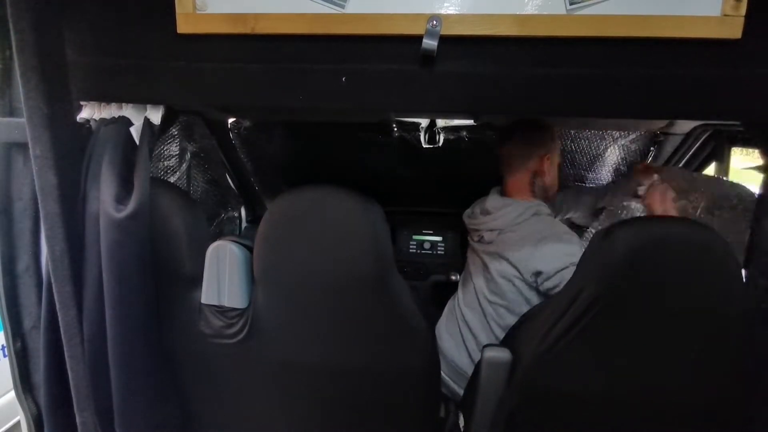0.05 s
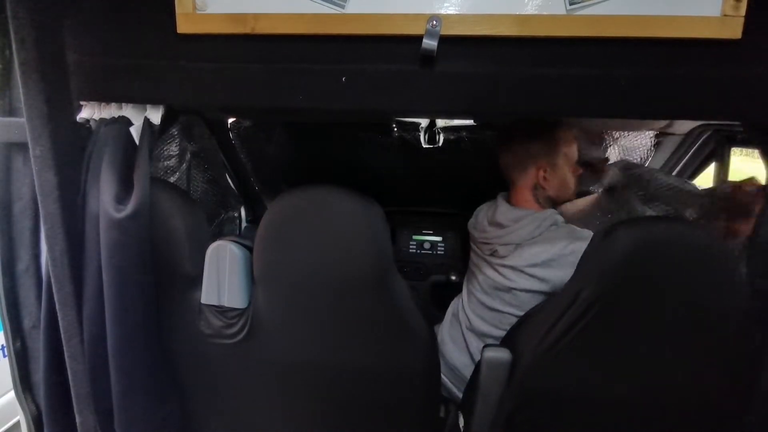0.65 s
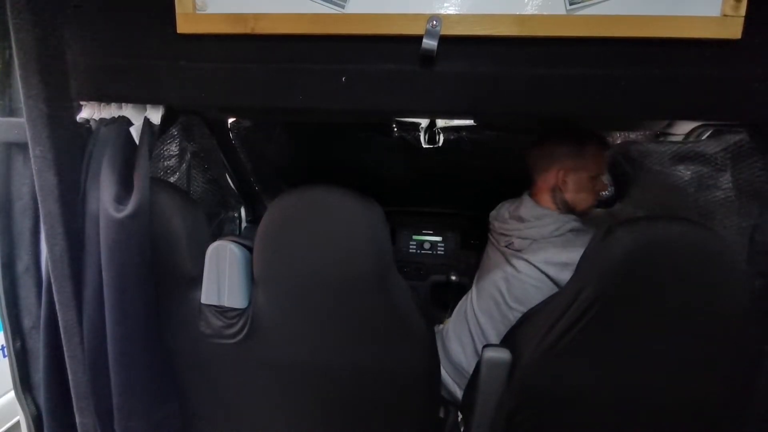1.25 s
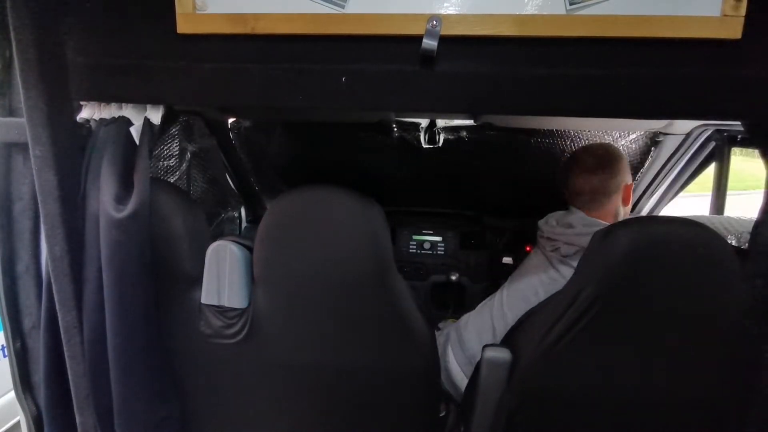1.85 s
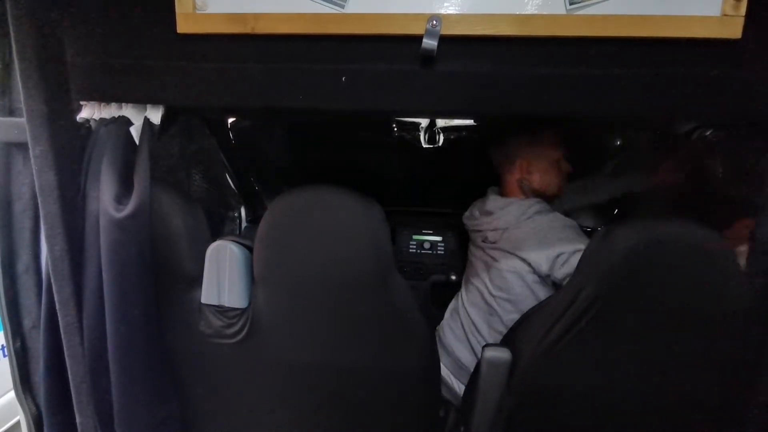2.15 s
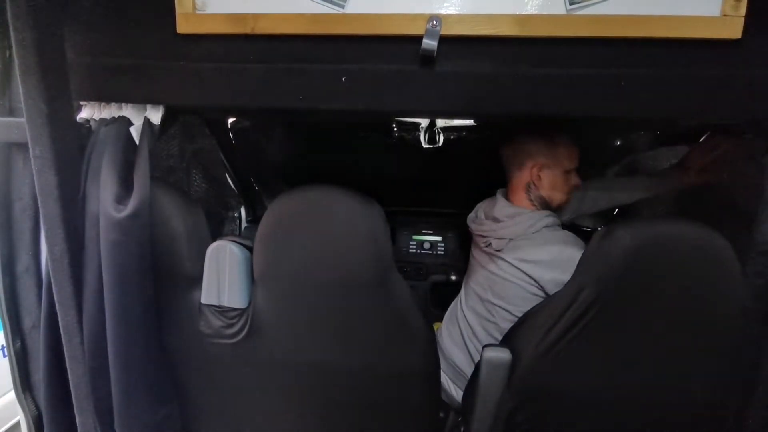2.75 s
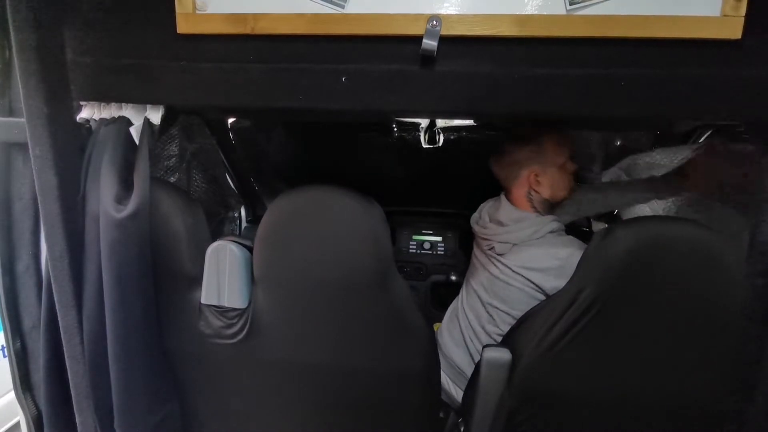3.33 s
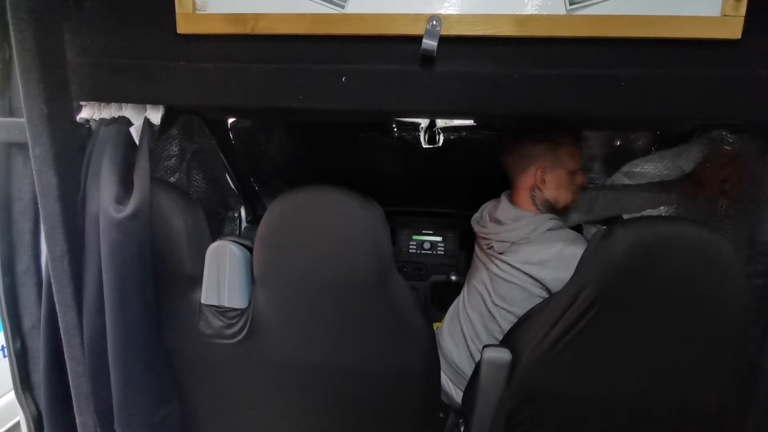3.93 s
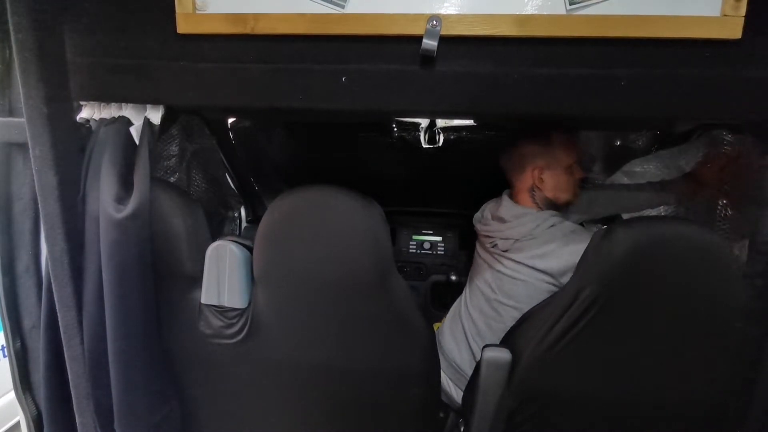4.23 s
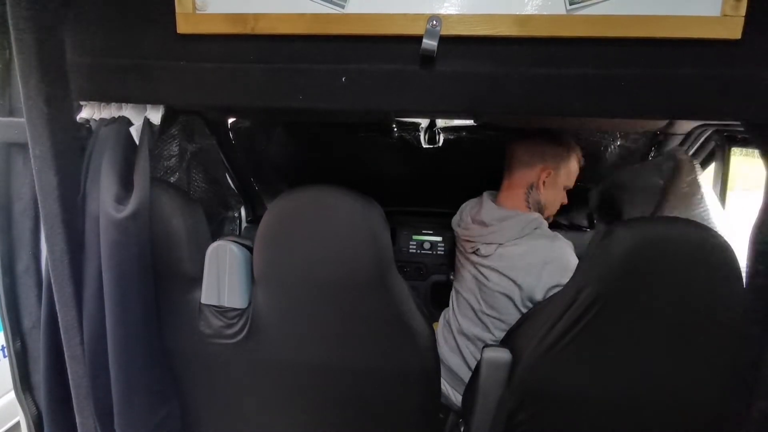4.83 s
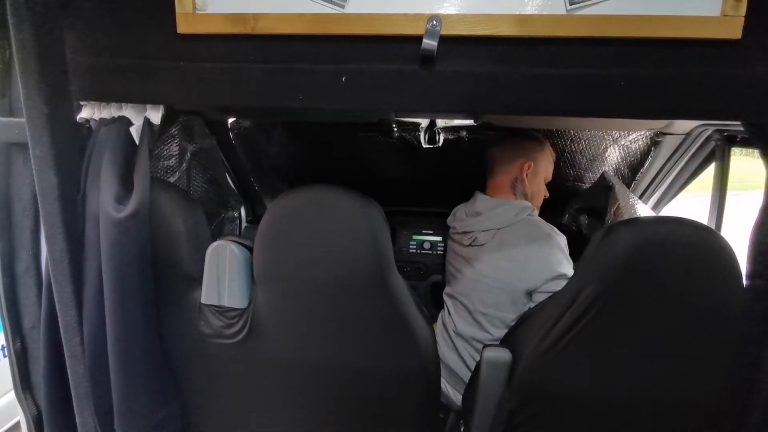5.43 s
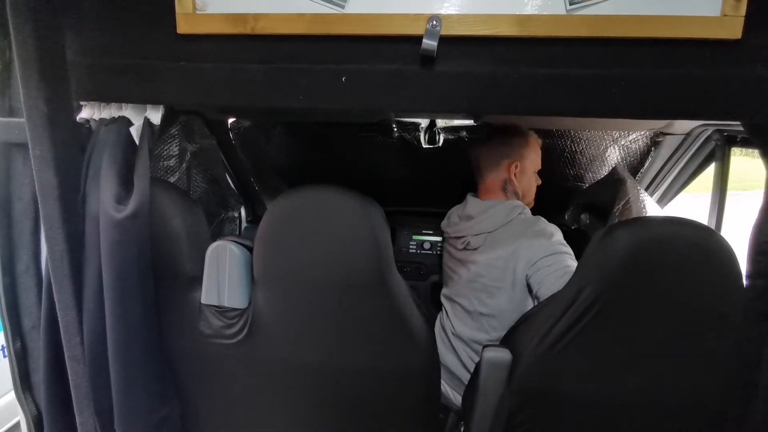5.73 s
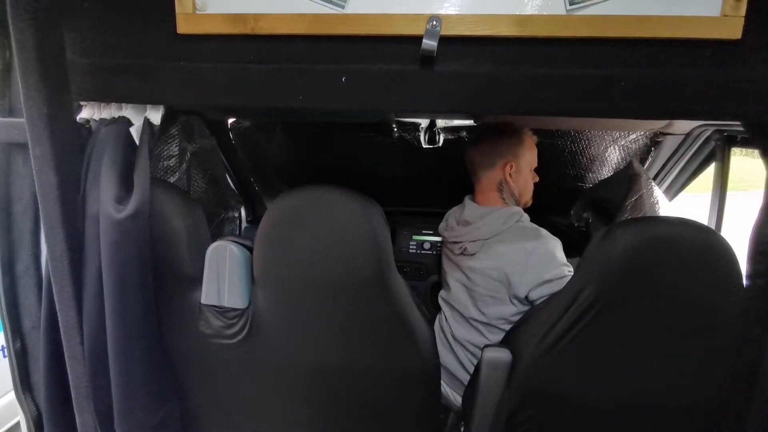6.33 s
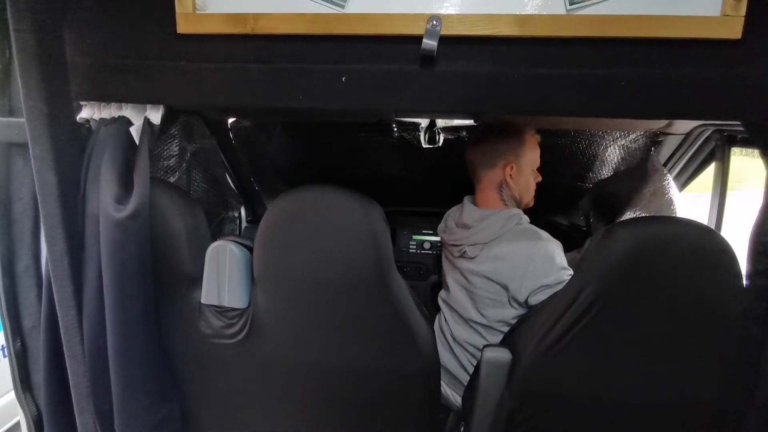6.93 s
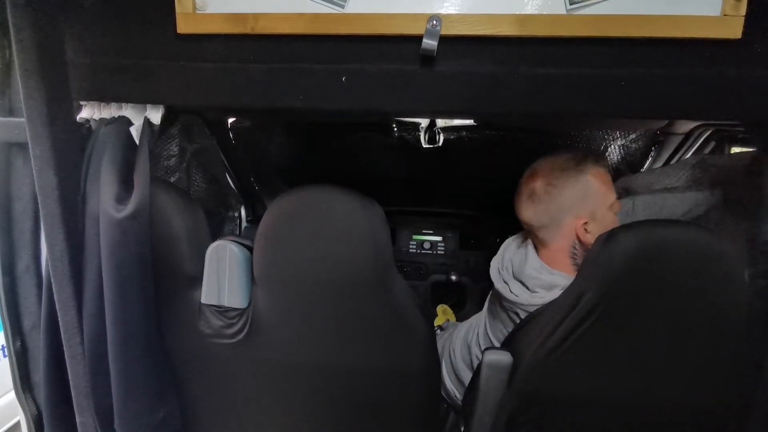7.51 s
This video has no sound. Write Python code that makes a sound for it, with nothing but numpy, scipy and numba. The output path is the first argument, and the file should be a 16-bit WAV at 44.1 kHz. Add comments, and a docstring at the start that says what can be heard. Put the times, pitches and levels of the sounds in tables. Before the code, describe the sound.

A sheet of bubble foil insulation is handled against the side window of a parked van, heard from behind the seats. From the start it hisses, rasps and crinkles in short, uneven shoves, with soft flaps and small edge squeaks through the first half. Stiff folds snap with sharp pops at about 1.3 and 1.4 seconds, and a bright crack comes at 2.6. Dull flaps thump the air between roughly 2.7 and 4 seconds, strongest near 3.6. From 4.3 to 4.7 seconds, hands press the sheet onto the door panel in a quick cluster of hollow knocks and clacks. From about 5 seconds, lighter rubbing continues with fine, bright crackles and ticks under the fingers, busiest around 6 to 6.6. A few soft pats and rustles carry on to about 7.7 seconds. The padded cab has very little echo, and a faint low hum comes from outside.

```python
"""Inside a parked van, heard from behind the seats, bubble foil is slid, bent and pressed on a side window.
Its skin hisses and its bubbles rasp as it slides; fingers make it crackle and its edge squeaks.
Bending it pops the padding, snaps its creases and pushes the air in the cab. The sheet flaps, and hands
knock it onto the door panel. The padded cab adds only a few short echoes; the outside hums faintly."""
import sys
import numpy as np
from scipy import signal
from scipy.fft import rfft, irfft, next_fast_len
from scipy.io import wavfile
from scipy.ndimage import uniform_filter1d, map_coordinates
from numba import njit

SR = 44100
rng = np.random.default_rng(int(sys.argv[2]) if len(sys.argv) > 2 else 0)


def transcribe(u):
    """Save the signal u as a 16-bit wav file named by the first command-line argument.

    u: samples, shape (n,) or (channels, n), limited to [-1, 1]; the rate is SR.
    q: integer samples, one column per channel.
    """
    v = np.clip(np.atleast_2d(u).T, -1, 1)
    q = np.round(v * 32767).astype(np.int16)
    wavfile.write(sys.argv[1], SR, q)


N = 338247
T = np.arange(N) / SR
HIT_T = T[:SR // 5]  # the clock of one hit, in seconds


def undb(db):
    """Turn decibels into a gain to multiply by."""
    return 10 ** (np.asarray(db) / 20)


def unit(x):
    """Scale a sound to an average power of 1."""
    return x / np.sqrt(np.mean(x ** 2))


def fader(points):
    """Join (time, level) points into a gain for every sample."""
    return undb(np.interp(T, *np.transpose(points)))


def along(points, hz):
    """Read between (pitch, value) points, with octaves evenly spaced."""
    pitches, values = np.transpose(points)
    return np.interp(np.log(hz + 1), np.log(pitches), values)


def colour(x, points):
    """Give a sound the tone drawn by (pitch, level) points."""
    size = 4096
    cepstrum = irfft(np.log(undb(along(points, np.fft.rfftfreq(size, 1 / SR)))))
    cepstrum[1:size // 2] *= 2
    cepstrum[size // 2 + 1:] = 0  # so nothing rings before the sound starts
    response = irfft(np.exp(rfft(cepstrum)))
    return signal.oaconvolve(x, response[None], axes=-1)[:, :x.shape[-1]]


def resonate(x, hz, q):
    """Keep the sound near one pitch; a higher q rings more sharply."""
    return signal.lfilter(*signal.iirpeak(min(hz, .3 * SR), max(q, 1), fs=SR), x)


@njit
def sweep(pair, hz, q):
    """Keep the sound near a pitch that moves."""
    out = np.zeros(pair.shape)
    for c in range(2):
        band, low = 0., 0.
        for i in range(len(hz)):
            g = np.tan(np.pi * min(hz[i] / SR, .4))
            v = (band + g * (pair[c, i] - low)) / (1 + g * (g + 1 / q))
            band, low, out[c, i] = 2 * v - band, low + 2 * g * v, v / q
    return out


# sound that the two microphone openings do not share: (pitch [Hz], level [dB])
UNSHARED = [(100, -33.5), (400, -12), (1400, -9.5), (4000, -0.5), (15000, -1)]
def stereo(pair, lag_samples=2):
    """Row 0 reaches both sides and row 1 sets them apart; the left hears a little later."""
    hz = np.fft.rfftfreq(pair.shape[-1], 1 / SR)
    apart = irfft(rfft(pair[1]) * undb(along(UNSHARED, hz)), pair.shape[-1])
    left = np.pad(pair[0] + apart, (lag_samples, 0))[:-lag_samples]
    return np.array([left, pair[0] - apart])


def wander(per_s):
    """A smooth random wobble, about 1 in size."""
    hold = int(SR / per_s)
    steps = np.repeat(rng.standard_normal(N // hold + 1), hold)
    return 0.97 * uniform_filter1d(uniform_filter1d(steps, hold), hold)[:N]


def burst(decay_s, tail_db, tail_s, even=0.071):
    """One click scattered by glass and seats, with a weak tail; even (0-1) flattens its tone."""
    t = HIT_T[:SR // 10]
    shape = np.exp(-t / decay_s) + undb(tail_db) * np.exp(-t / tail_s)
    spectrum = rfft(rng.standard_normal((2, len(t))) * shape)
    wave = irfft(spectrum / np.abs(spectrum) ** even, len(t))
    return stereo(wave) * (1 - t / t[-1]) ** 2


def ring(tones, rise_s, stretch=1):
    """Tones swell, then fall 60 dB in their ring time; each struck spot sounds a little different."""
    wave = 0
    for hz, db, ring_s in tones:
        detune, extra_db = rng.standard_normal(2)
        phase = 2 * np.pi * hz * stretch * (1 + 0.025 * detune) * HIT_T
        wave = wave + undb(db + extra_db) * np.sin(phase) * np.exp(-np.log(1000) * HIT_T / ring_s)
    return np.array([wave, wave]) * (1 - np.exp(-HIT_T / rise_s)) * np.cos(np.pi / 2 * HIT_T / HIT_T[-1])


def add(out, s, db, hit):
    """Mix a hit in at time s; db is its energy spread over a hundredth of a second."""
    start = int(s * SR)
    hit = hit * undb(db) / np.sqrt(np.sum(hit ** 2) / 2 / (SR / 100))
    out[:, start:start + hit.shape[1]] += hit[:, :N - start]


def slips(per_s, spread_db):
    """Tiny clicks at random moments, many weak and a few strong."""
    clicks = np.zeros(N)
    at = rng.integers(0, N, int(per_s * N / SR))
    signs = rng.choice([-1, 1], len(at))
    clicks[at] = signs * undb(spread_db * np.minimum(rng.exponential(size=len(at)), 4.5))
    return clicks


def drive(clicks, response):
    """Every click sets off the same stereo sound."""
    return signal.oaconvolve(clicks[None], response, axes=-1)[:, :N]


def grains(per_s, spread_db, smear_s, places=3):
    """Slips from several places on the sheet, each with its own short echoes."""
    return sum(drive(slips(per_s / places, spread_db), burst(smear_s, -16.5, 0.015, even=0.78))
               for _ in range(places))


def shifting(x, depth_db, per_s, per_octave):
    """As the sheet changes shape, some pitches swell and others fade."""
    hz, s, frames = signal.stft(x, SR, nperseg=512)
    patches = rng.standard_normal((64, 512))
    place = np.meshgrid(per_octave * np.log2(1 + hz / 500), per_s * s, indexing="ij")
    swell = undb(depth_db * map_coordinates(patches, place, order=2, mode="mirror"))
    return signal.istft(frames * swell, SR)[1][:, :N]


def shove(start, length, rise_s, fade_s, sag_db_per_s=0):
    """Gain of one movement: it gathers speed, may ease a little and dies away."""
    t = np.maximum(T - start, 0)
    rise = np.sin(np.pi / 2 * np.minimum(t / rise_s, 1)) ** 2
    return rise * undb(-sag_db_per_s * t) * np.exp(-np.maximum(t - length, 0) / fade_s)


# light rubbing of the held sheet: (time [s], level [dB])
LIGHT_RUBBING = [(.12, -73), (.2, -61), (.55, -58.5), (.8, -64.5), (1.0, -61.5), (1.2, -59), (1.355, -71),
                 (1.42, -78), (1.48, -55.5), (2.15, -71.5), (2.4, -64), (2.55, -56.5), (2.665, -79),
                 (2.74, -66), (3.0, -63.5), (3.22, -69.5), (3.3, -73), (3.48, -61.5), (4.05, -63.5),
                 (4.4, -64), (4.55, -67), (4.65, -64), (5.0, -61.5), (5.28, -58.5), (5.36, -70.5),
                 (5.55, -63), (5.9, -62.5), (6.7, -62.5), (7.0, -61.5), (7.4, -67), (7.665, -67)]
# shoves of the sheet: (start [s], length [s], hiss [dB], rasp [dB], crumple [dB])
SHOVES = [(-0.02, 0.1, -48.5, -46, -46), (0.131, 0.027, -55, -54, -62), (0.206, 0.11, -50, -49, -53),
          (0.36, 0.038, -45.5, -42, -68), (0.432, 0.09, -46, -45, -49.5), (0.565, 0.16, -52, -50.5, -55),
          (0.861, 0.089, -54, -57.5, -54.5), (0.984, 0.13, -50.5, -49.5, -50.5),
          (1.142, 0.054, -59, -66, -53), (1.237, 0.089, -44.5, -45, -52.5), (1.312, 0.03, -57, -46.5, -41),
          (1.417, 0.06, -42.5, -46, -47.5), (1.458, 0.054, -52, -66, -48.5),
          (1.554, 0.069, -46.5, -48, -52.5), (1.728, 0.13, -49, -50.5, -49),
          (1.853, 0.12, -50.5, -51.5, -69), (1.912, 0.14, -49, -49.5, -50.5),
          (2.084, 0.074, -52, -52.5, -58), (2.173, 0.098, -52.5, -53.5, -54),
          (2.277, 0.045, -46, -46.5, -57), (2.475, 0.14, -51.5, -56.5, -76), (2.669, 0.12, -55, -56.5, -61),
          (2.855, 0.087, -47, -47.5, -50.5), (2.97, 0.076, -62, -68, -71), (3.055, 0.035, -52.5, -53, -40),
          (3.153, 0.066, -56, -61.5, -88), (3.334, 0.13, -48, -48, -53), (3.48, 0.049, -65, -58, -51),
          (3.62, 0.031, -50.5, -57, -52), (3.676, 0.04, -51, -45.5, -46.5), (3.795, 0.035, -45, -49.5, -45),
          (3.877, 0.069, -53.5, -59.5, -60.5), (4.082, 0.082, -48.5, -59.5, -50),
          (4.171, 0.1, -47.5, -51, -47.5), (4.31, 0.065, -51, -50, -40), (4.609, 0.044, -49.5, -60, -50.5),
          (4.766, 0.031, -54, -57, -56), (4.951, 0.17, -53, -60, -77), (5.052, 0.094, -50.5, -54.5, -65),
          (5.15, 0.05, -61, -53.5, -57.5), (5.206, 0.041, -48, -52, -76), (5.395, 0.017, -50.5, -72, -75),
          (5.53, 0.16, -51, -52, -60.5), (5.81, 0.13, -57.5, -55, -63.5), (5.952, 0.025, -49.5, -46.5, -75),
          (6.028, 0.085, -49, -54, -53.5), (6.132, 0.17, -57, -62.5, -62), (6.333, 0.084, -55, -66, -62),
          (6.709, 0.11, -59.5, -61.5, -57), (6.881, 0.048, -54, -48.5, -51.5),
          (7.168, 0.1, -52.5, -60.5, -62), (7.354, 0.1, -58, -62, -74), (7.463, 0.025, -51, -57, -82),
          (7.58, 0.11, -68, -58, -50.5)]
def handling():
    """Gains of hiss, rasp and crumple: each shove drives all three, on top of the light rubbing."""
    power = np.outer(undb([0, -2, -1.5]), fader(LIGHT_RUBBING)) ** 2
    for start, length, *levels_db in SHOVES:
        effort = shove(start, length, rise_s=0.026, fade_s=0.017, sag_db_per_s=1.5)
        power += np.outer(undb(levels_db), effort) ** 2
    return np.sqrt(power)


# tone of the sliding skin: (pitch [Hz], level [dB])
HISS_TONE = [(1500, -29.5), (3200, -4), (5000, -2.5), (6800, -2.5), (8700, 0.5), (11000, -2.5), (15500, -5)]
def skin_hiss(grip):
    """The foil's skin slides in thousands of tiny slips that blur into a hiss."""
    hiss = colour(grains(4500, 2.6, 0.00063), HISS_TONE)
    return unit(grip * shifting(hiss, depth_db=1, per_s=14, per_octave=4.95))


# tone of the dragging bubbles: (pitch [Hz], level [dB])
RASP_TONE = [(400, -4), (600, -4.5), (760, -3.5), (1050, 0.5), (1600, -3), (2400, -2), (3500, -4),
             (5500, -14), (10000, -24.5)]
def bubble_rasp(grip):
    """Bubbles rasp over trim and glass; the rubbing patch rings higher or lower as it shrinks and grows."""
    rasp = colour(grains(2000, 3.5, 0.0025), RASP_TONE)
    rasp = shifting(rasp, depth_db=4, per_s=19, per_octave=4.146)
    patch_hz = 1950 * 2 ** (wander(11) / 2)
    patch = sweep(rasp.copy(), patch_hz, q=2.8)
    return undb(-2.5) * unit(grip * (rasp + undb(-7) * patch))


# tone of the buckling padding: (pitch [Hz], level [dB])
CRUMPLE_TONE = [(80, -15.5), (170, -1), (240, 5), (380, 0), (520, -1), (750, -18.5), (1500, -40.5)]
def padding_crumple():
    """The bubble layer buckles in dull little pops."""
    return undb(-1.5) * unit(colour(grains(350, 3.8, 0.002), CRUMPLE_TONE))


# deep tones of the air in the cab: (pitch [Hz], level [dB], ring time [s])
AIR_TONES = [(51.7, -12.5, .15), (80.5, 5, 0.21), (109.2, 6, 0.13), (172.5, 3, 0.14)]
# broad sways of the sheet: (start [s], length [s], level [dB])
SHEET_SWAYS = [(1.458, 0.17, -52), (1.7, 0.096, -45.5), (2.293, 0.06, -46.5), (2.89, 0.16, -51.5),
               (3.056, 0.034, -36.5), (3.564, 0.033, -36), (3.803, 0.044, -46), (4.085, 0.063, -36.5),
               (4.43, 0.14, -43.5), (7.634, .07, -46)]
def air_rumble(crumple_gain):
    """Broad sways pump the air in the cab, and any bending moves it a little too."""
    sway_gain = sum(undb(db) * shove(start, length, rise_s=0.03, fade_s=0.034)
                    for start, length, db in SHEET_SWAYS)
    rumble = unit(drive(slips(600, 1.3), ring(AIR_TONES, rise_s=0.024)))
    return undb(-3) * rumble * np.hypot(sway_gain, undb(-7.5) * crumple_gain)


# fingers working the edge of the sheet: (time [s], level [dB])
FINGERING = [(0, -60), (1.1, -54.5), (3.2, -64), (5.4, -67), (5.6, -49.5), (6.1, -51), (6.45, -45.5),
             (6.7, -73), (6.92, -53), (7.4, -87)]
def finger_crackle(hiss_gain):
    """Single bubbles tick under the fingers; each size has its own pitch and comes in flurries."""
    ticks = 0
    for hz in np.geomspace(2200, 12500, 9):
        flurries = slips(70, 2.6) * undb(4 * wander(25))
        tick = unit(resonate(burst(0.0012, -18, 0.005), hz, q=4))
        ticks = ticks + drive(flurries, tick)
    moving = np.minimum(hiss_gain / undb(-53), 1) ** 2  # a sheet at rest is silent
    return unit(ticks) * fader(FINGERING) * moving


# tone of the world outside: (pitch [Hz], level [dB])
HUM_TONE = [(25, -0.5), (70, 2.5), (200, -5), (700, -20), (2000, -21.5), (5000, -26), (15500, -50.5)]
def outside_hum():
    """A faint, low noise from outside enters the cab."""
    return undb(-63.5) * unit(colour(stereo(rng.standard_normal((2, N))), HUM_TONE))


# squeaks of an edge: (middle [s], half length [s], pitch [Hz], glide [octaves/s], level [dB])
SQUEAKS = [(0.088, 0.018, 3660, -7, -46), (0.159, 0.018, 1870, -6, -52.5), (0.213, 0.068, 1300, 1, -54),
           (0.326, 0.22, 1930, 0.5, -56), (0.838, 0.0099, 3220, 0, -55), (1.94, 0.086, 2080, -4, -49.5),
           (2.052, 0.054, 2200, 3, -53.5), (2.198, 0.017, 2180, -3, -52), (2.77, 0.04, 1750, -4, -61),
           (2.99, 0.06, 3670, 5, -58), (3.194, 0.046, 2100, -7, -52), (3.401, 0.039, 2210, -0.5, -46.5),
           (3.677, 0.005, 2820, -2, -37.5)]
def edge_squeaks():
    """An edge sticks and slips quickly, ringing a patch of foil whose pitch glides as the edge travels."""
    out = np.zeros((2, N))
    stutter = grains(3200, 2.0, 0.00073, places=1)
    for s, half_s, hz, glide, db in SQUEAKS:
        start, stop = (int(np.clip(t * SR, 0, N)) for t in (s - half_s, s + half_s))
        pitch = hz * 2 ** (glide * (T[start:stop] - s))
        squeak = sweep(sweep(stutter[:, start:stop].copy(), pitch, q=2.3), pitch, q=2.3)
        out[:, start:stop] += undb(db) * unit(squeak) * np.hanning(stop - start)
    return out


# tone of a tick in the foil: (pitch [Hz], level [dB])
TICK_TONE = [(400, 3), (2800, -2), (11000, -1.5), (15500, -4)]
# small creases in the skin: (time [s], level [dB], pitch [Hz])
CREASES = [(0.151, -55.5, 3480), (0.224, -50, 2500), (0.376, -46.5, 3000), (0.6085, -45.5, 4500),
           (0.833, -49.5, 3200), (0.943, -49.5, 2800), (1.037, -50, 7000), (2.0251, -46, 2170),
           (2.4483, -52.5, 1480), (4.455, -42, 6800), (4.596, -44.5, 8350), (5.226, -48, 7500),
           (5.247, -39, 7340), (5.2955, -38, 3170), (5.578, -46.5, 6000), (5.752, -48.5, 4000),
           (5.8, -45.5, 9150), (5.887, -48.5, 4940), (5.965, -47.5, 6000), (5.9917, -46, 8000),
           (6.039, -46.5, 5300), (6.1226, -51, 6030), (6.162, -42, 8900), (6.17, -43, 11000),
           (6.2326, -45, 6500), (6.281, -47, 8100), (6.325, -47.5, 8000), (6.381, -45.5, 8500),
           (6.458, -46, 6060), (6.52, -47, 8550), (6.5704, -39.5, 4970), (6.581, -35, 7600),
           (6.632, -48.5, 7300), (6.773, -52, 7500), (6.875, -48, 6000), (6.8883, -39, 8100),
           (7.012, -48.5, 7400), (7.1367, -54, 5500), (7.1584, -41, 8500), (7.48, -52.5, 7000)]
def crease_ticks():
    """Each small crease gives way in two steps, a weak tick and then a strong one."""
    out = np.zeros((2, N))
    for s, db, hz in CREASES:
        for when, step_db in ((s - .005, db - 10), (s, db)):
            tick = colour(burst(0.003, -19, 0.0085), TICK_TONE)
            add(out, when, step_db, tick + 2.9 * resonate(tick, hz, q=1.5))
    return out


# tone of a touch on the sheet: (pitch [Hz], level [dB])
CLACK_TONE = [(300, -7), (620, -9), (850, 1.5), (1100, -5.5), (1550, -4.5), (2100, -5.5), (3000, -7),
              (4500, -9), (9000, 8.5), (15500, -8.5)]
def hollow_clack(hz):
    """A touch rings the pocket under the sheet; the lower it rings, the duller it sounds."""
    treble_cut = signal.butter(3, min(1.8 * hz, SR / 4), fs=SR, output="sos")
    clack = signal.sosfilt(treble_cut, colour(burst(0.0057, -20, 0.012), CLACK_TONE))
    return clack + 0.89 * resonate(clack, hz, q=3.8)


# tones of the tight sheet: (pitch [Hz], level [dB], ring time [s])
SHEET_TONES = [(203, -8, 0.045), (300, 5, 0.025), (399.6, -0.5, 0.04)]
# tone of the loose sheet fluttering on: (pitch [Hz], level [dB])
FLUTTER_TONE = [(80, -25.5), (180, 1.5), (330, 0), (450, -5.5), (650, -23.5), (1500, -58)]
# soft flaps and pats: (time [s], air boom [dB], sheet [dB], clack [dB])
PATS = [(0.376, -54, -33.5, -46), (0.519, -49, -37.5, -50), (0.554, -58, -45, -64),
        (0.583, -63, -40.5, -51), (0.6106, -71, -39, -46.5), (1.04, -55, -43.5, -59),
        (1.11, -43, -39.5, -52), (1.1742, -56, -43, -68), (1.193, -41, -38, -63), (1.302, -43, -36, -53),
        (1.441, -37, -54, -63), (1.7506, -52, -38, -52), (1.83, -59, -40, -52), (1.947, -58, -30.5, -45.5),
        (2.3256, -44, -40, -72), (2.63, -70, -43, -70), (2.716, -39.5, -47, -76), (2.852, -38.5, -29, -44),
        (3.052, -35.5, -40, -45.5), (3.08, -40.5, -39, -52), (3.461, -45.5, -38, -45),
        (3.575, -36, -25.5, -35.5), (3.704, -35, -49, -45.5), (3.754, -55, -40, -53),
        (3.786, -57, -34.5, -35), (3.811, -39.5, -42, -55), (3.93, -70, -48, -58), (4.014, -43, -42, -57.5),
        (4.855, -49, -42, -50), (5.019, -63, -46, -48), (5.0942, -71, -40.5, -57),
        (6.042, -70, -44.5, -52.5), (6.15, -58, -46.5, -56), (6.19, -57, -42.5, -76),
        (6.403, -68, -46.5, -65), (6.568, -72, -38, -47), (6.809, -60, -46, -55), (6.893, -65, -41, -70),
        (7.062, -71, -43, -59), (7.272, -50, -41, -56)]
def sheet_flaps():
    """A soft flap thumps the air, rings the sheet and lands with a clack."""
    out = np.zeros((2, N))
    for s, boom_db, sheet_db, clack_db in PATS:
        clack_hz = 1310 * 2 ** ((-52 - boom_db) / 36.5)  # heavier pats land duller
        add(out, s, boom_db, ring(AIR_TONES, rise_s=0.0036))
        add(out, s, sheet_db - 5.5, ring(SHEET_TONES, rise_s=0.0011))
        add(out, s, sheet_db - 5, colour(burst(0.017, -27, 0.033), FLUTTER_TONE))
        add(out, s, clack_db, hollow_clack(clack_hz))
    return out


# tones of a flipping fold: (pitch [Hz], level [dB], ring time [s])
FOLD_TONES = [(1035, -6, 0.019), (1555, -4.5, 0.018), (2365, 2, 0.028), (3610, -9.5, 0.038)]
# tone of its pop: (pitch [Hz], level [dB])
POP_TONE = [(100, -41), (330, -12.5), (650, -18.5), (1050, 1.5), (1400, 1), (1850, 0.5), (2350, -3),
            (3000, -3.5), (4100, -10), (6000, -15), (14000, -41.5)]
# tone of its crack: (pitch [Hz], level [dB])
CRACK_TONE = [(700, -14), (1500, -15), (3800, -12.5), (5300, -13), (6600, -12.5), (8000, -7.5),
              (9300, -3.5), (10800, -15), (15500, -19.5)]
# stiff folds snapping over: (time [s], pop [dB], pop pitch [Hz], crack [dB])
FOLD_FLIPS = [(1.2876, -26.5, 2200, -39), (1.2938, -20, 1150, -34.5), (1.3, -32.5, 1800, -46.5),
              (1.4361, -24, 2300, -52), (1.444, -38, 1850, -56), (1.9483, -38.5, 1350, -52),
              (2.6087, -27.5, 2700, -29), (2.6145, -31, 1700, -19.5), (2.629, -35.5, 700, -43.5),
              (2.634, -38.5, 1900, -33), (2.645, -41.5, 1100, -45.5)]
def fold_snaps():
    """A stiff fold flips with a bright crack and a ringing pop, pitched by the size of the patch."""
    out = np.zeros((2, N))
    for s, pop_db, pop_hz, crack_db in FOLD_FLIPS:
        pop = unit(colour(burst(0.0058, -21, 0.015), POP_TONE))
        pop = pop + undb(-6.5) * unit(ring(FOLD_TONES, rise_s=0.0004)[:, :pop.shape[1]])
        add(out, s, pop_db, pop + 1.2 * resonate(pop, pop_hz, q=5))
        add(out, s, crack_db, colour(burst(0.0026, -14, 0.011), CRACK_TONE))
    return out


# tones of the door panel: (pitch [Hz], level [dB], ring time [s])
PANEL_TONES = [(184, -9, 0.062), (279, -5, 0.28), (301, 11, 0.098), (352, 3, 0.13), (406, -5.5, 0.086),
               (642, -6.5, 0.07), (838, -11.5, 0.09)]
# firm presses: (time [s], air boom [dB], panel [dB], panel pitch [Hz], clack [dB], clack pitch [Hz])
PRESSES = [(4.2804, -58, -22, 313.5, -29.5, 1640), (4.3001, -43, -42, 332, -37, 950),
           (4.3146, -51, -43, 304, -39.5, 1150), (4.334, -36, -25, 298.5, -28.5, 1510),
           (4.352, -48, -41, 327, -52, 1000), (4.374, -41, -37, 332, -44, 1250),
           (4.385, -45, -40, 300, -45.5, 1320), (4.411, -66, -28, 379, -37, 560),
           (4.4256, -47, -35, 297, -31.5, 1620), (4.461, -37, -36.5, 313, -37, 1850),
           (4.489, -37, -30, 313, -43.5, 1950), (4.5, -33, -32.5, 184, -47, 1020),
           (4.537, -46, -39, 286, -57, 1140), (4.585, -43, -32, 308, -49.5, 1600),
           (4.625, -53, -46, 328, -62, 800), (4.663, -53, -44.5, 304, -64, 795),
           (4.719, -49, -46, 220, -66, 497)]
def door_knocks(usual_panel_hz=305.7, slip_gap_s=0.008):
    """Hands press the sheet onto the door: the air booms, the panel rings and the squeezed foil ticks."""
    out = np.zeros((2, N))
    for s, boom_db, panel_db, panel_hz, clack_db, clack_hz in PRESSES:
        stretch = panel_hz / usual_panel_hz  # tension sets the pitch
        add(out, s, boom_db, ring(AIR_TONES, rise_s=0.0036))
        add(out, s, panel_db, ring(PANEL_TONES, rise_s=0.003, stretch=stretch))
        add(out, s, clack_db, hollow_clack(clack_hz))
        add(out, s, clack_db - 17, colour(burst(0.0045, -20, 0.0085), TICK_TONE))
        for slip, (late, octaves) in enumerate(rng.random((2, 2)), 1):  # the hand slips twice, weakly
            slip_hz = clack_hz * 2 ** (octaves - .5)
            add(out, s + (slip + late) * slip_gap_s, clack_db - 18, hollow_clack(slip_hz))
    return out


def scene():
    """All the handling of the sheet in the quiet cab."""
    hiss_gain, rasp_gain, crumple_gain = handling()
    grip = undb(2.75 * wander(110))  # skin and bubbles catch and slip together
    sliding = skin_hiss(grip) * hiss_gain + bubble_rasp(grip) * rasp_gain
    edges = edge_squeaks() + finger_crackle(hiss_gain)
    bending = padding_crumple() * crumple_gain + air_rumble(crumple_gain)
    hits = fold_snaps() + crease_ticks() + door_knocks() + sheet_flaps()
    return sliding + edges + bending + hits + outside_hum()


# how the microphone leans to one side: (pitch [Hz], left minus right [dB])
LEAN = [(100, 3), (380, 3), (1290, -0.5), (2380, -3.5), (4400, -0.5), (8120, -4.5), (15000, 0.5)]
def record(dry, bottom_hz=36, top_hz=16100):
    """Each side of the microphone has its own tone; the deepest bass and highest treble are cut."""
    size = next_fast_len(N + SR)
    lean_db = along(LEAN, np.fft.rfftfreq(size, 1 / SR))
    heard = irfft(rfft(dry, size) * undb(np.array([lean_db, -lean_db]) / 2), size)[:, :N]
    heard = signal.sosfilt(signal.butter(2, bottom_hz, "high", fs=SR, output="sos"), heard)
    return signal.sosfilt(signal.ellip(10, .2, 70, top_hz, fs=SR, output="sos"), heard)


dry = scene()
out = record(dry)
transcribe(out)
```